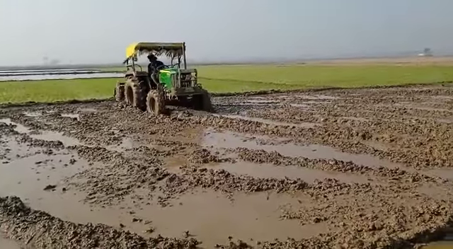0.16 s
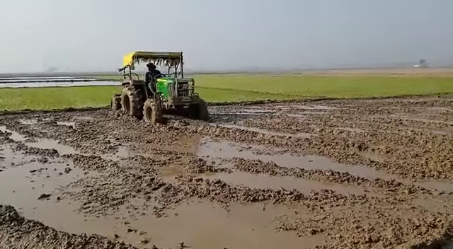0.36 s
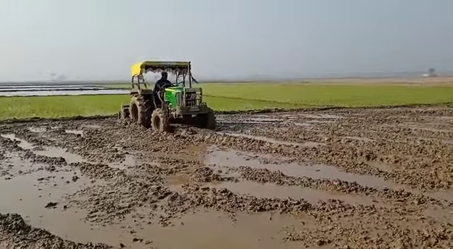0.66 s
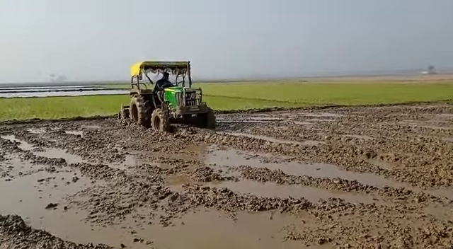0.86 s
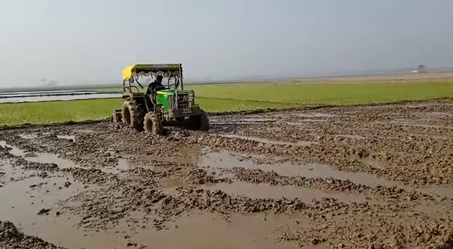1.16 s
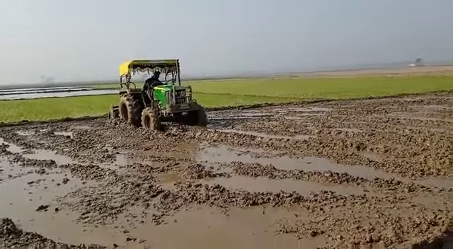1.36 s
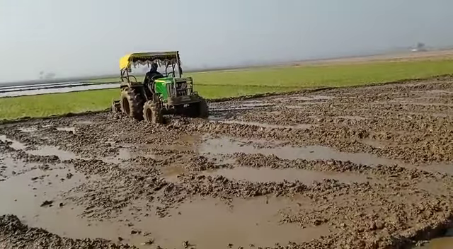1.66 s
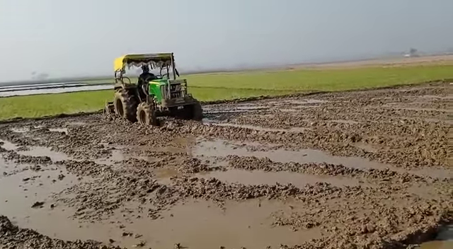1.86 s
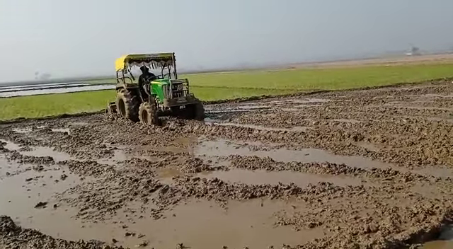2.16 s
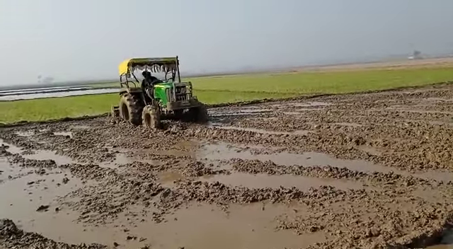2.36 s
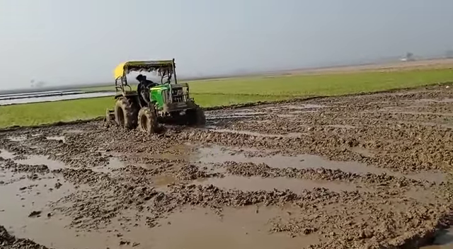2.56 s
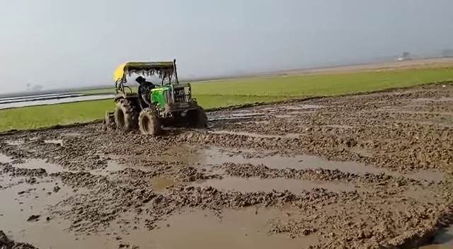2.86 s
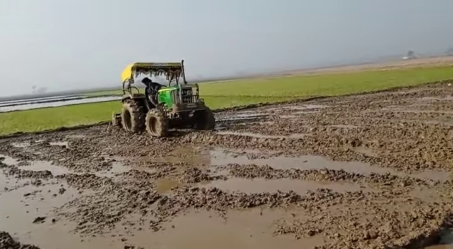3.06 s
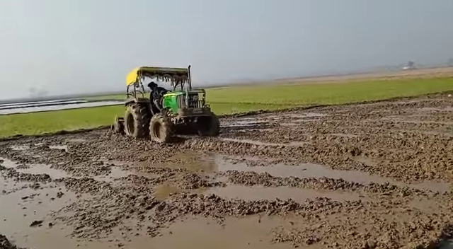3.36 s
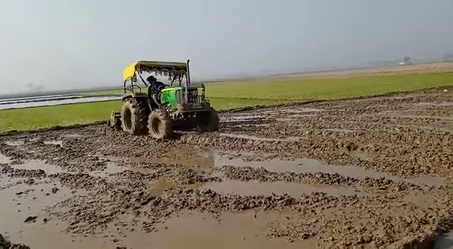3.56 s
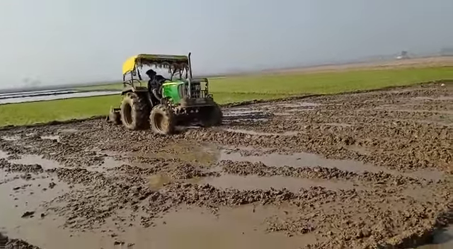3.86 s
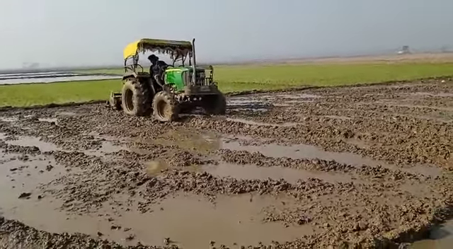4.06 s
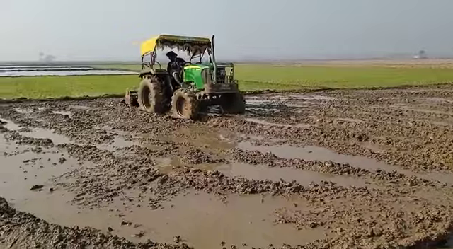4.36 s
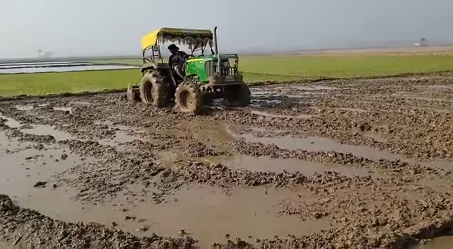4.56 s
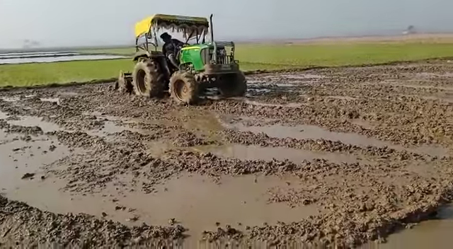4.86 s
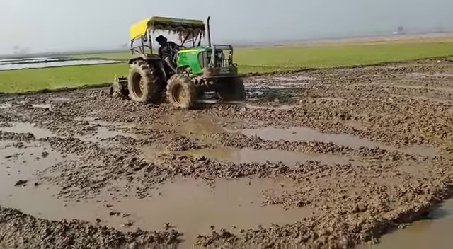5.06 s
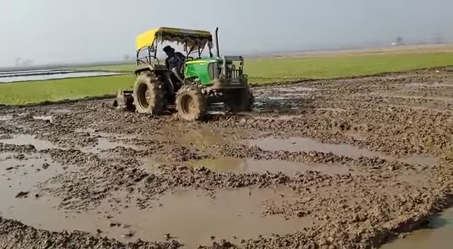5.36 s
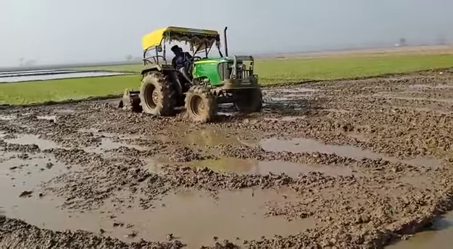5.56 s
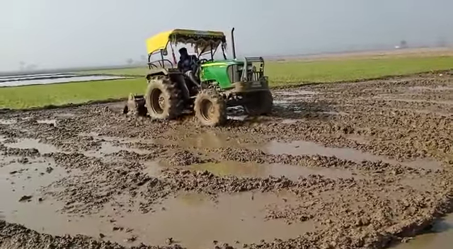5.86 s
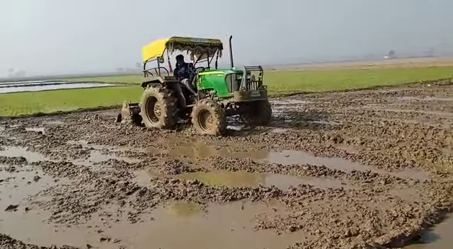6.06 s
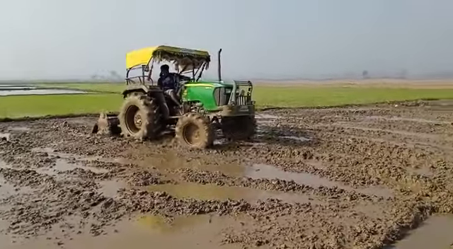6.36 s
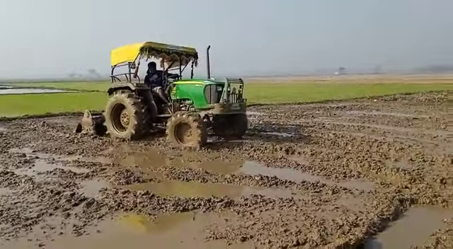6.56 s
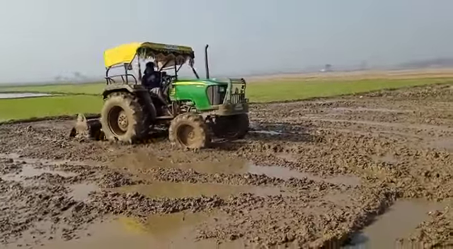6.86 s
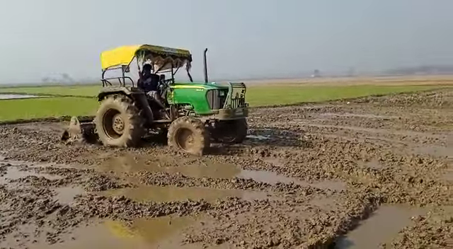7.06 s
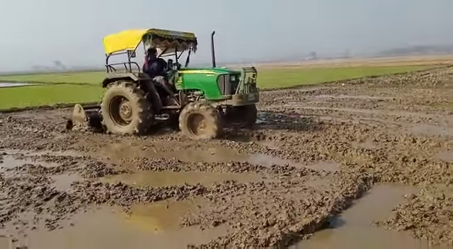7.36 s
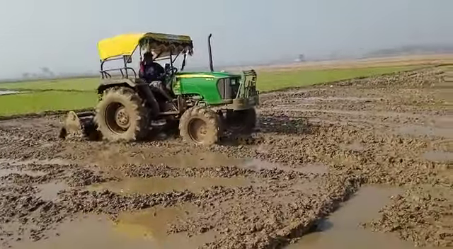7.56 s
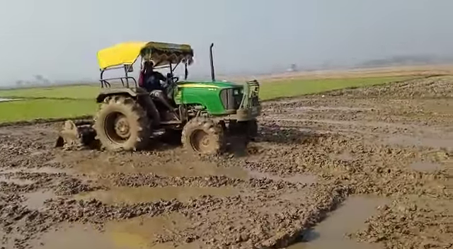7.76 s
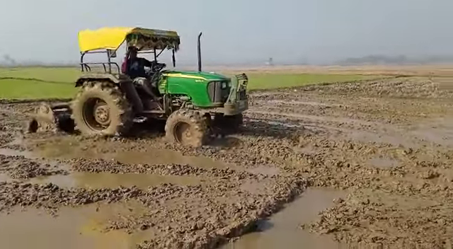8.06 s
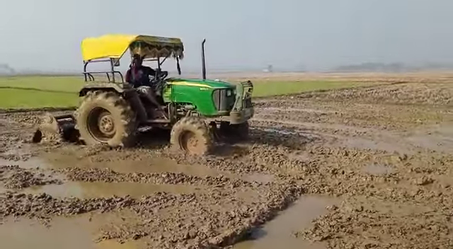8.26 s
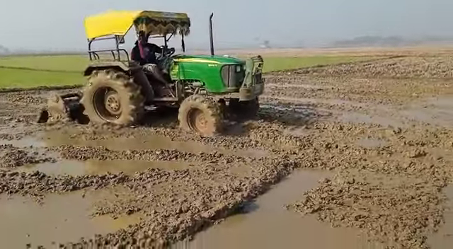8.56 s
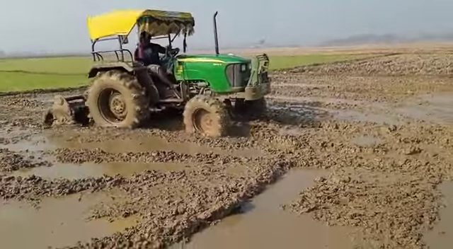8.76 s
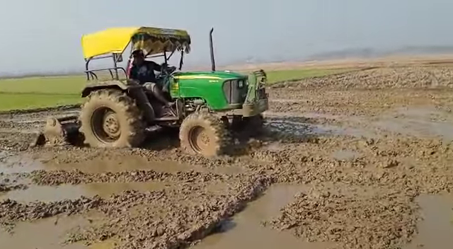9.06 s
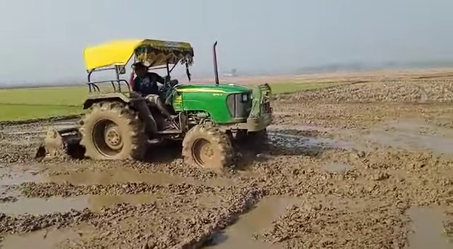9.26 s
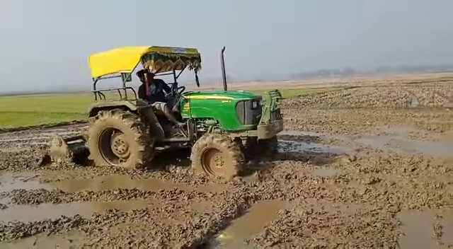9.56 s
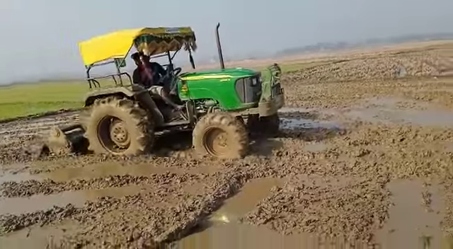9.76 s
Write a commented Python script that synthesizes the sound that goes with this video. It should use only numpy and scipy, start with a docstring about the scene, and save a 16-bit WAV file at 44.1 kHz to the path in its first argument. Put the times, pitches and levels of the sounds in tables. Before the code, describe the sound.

A diesel tractor chugs in an open, flooded field with no echo, its valves and gears clattering throughout. At first it runs lightly, some way off. A dull double thump sounds close to the microphone at about 0.4 seconds, and faint ticks of wet mud dot the first two seconds. The exhaust coughs twice near 1.4 seconds as the load comes on. Around 2.5 seconds there is a tiny metal squeak, the exhaust barks and the engine drops in pitch, laboring with hard knocks and metallic pings. Between 5 and 6.3 seconds it regains speed, then holds steady, growing louder and fuller as it approaches. From about 6 seconds a light hiss of flung mud appears. Another soft thump comes near 7.4 seconds, and the tiller's drone joins in, with mud pelting its hood, continuing under the engine until about 10 seconds.

```python
"""A flooded field, open and without reverberation: a three-cylinder diesel tractor drags a tiller, closing from
about 17 m to 11 m from the microphone. It runs light, takes up the load, lugs down with hard combustion knock
and regains its speed. Every firing drives the exhaust note, a bark from the stack and a knock in the block.
Gears and valves clatter throughout; later the tiller drones, throws mud and once strikes with a dull thump.
Close to the microphone are a double dull thump and faint ticks of wet mud."""
import sys
import numpy as np
from scipy import signal
from scipy.fft import rfft, irfft, next_fast_len
from scipy.io import wavfile
from scipy.ndimage import map_coordinates

SR = 44100
rng = np.random.default_rng(int(sys.argv[2]) if len(sys.argv) > 2 else 0)


def master(y):
    """Save y as 16-bit WAV."""
    cut = np.clip(np.atleast_2d(y).T, -1, 1)
    pcm = np.round(cut * 32767)  # scale
    wavfile.write(sys.argv[1], SR, pcm.astype(np.int16))


N = 437472

# engine speed (time [s], firing rate [Hz])
FIRING_RATE = [(0.0, 39.83), (0.54, 38.6), (1.2, 39.15), (1.47, 37.32), (2.16, 38.45), (2.53, 32.72),
               (2.84, 29.81), (3.64, 29.01), (3.98, 29.39), (4.51, 31.75), (4.96, 29.58), (5.83, 33.58),
               (6.29, 37.35), (6.74, 36.54), (7.03, 37.42), (7.36, 36.35), (8.27, 36.94), (8.55, 36.14),
               (8.68, 36.94), (9.92, 36.6)]
# firings that knock extra hard and ping (time [s], level [dB], ping pitch [Hz])
HARD_FIRINGS = [(2.4843, -19.5, 3700), (2.577, -18.5, 4180), (2.6075, -24, 4150), (2.8363, -25, 4100),
                (3.0685, -15, 4180), (3.1712, -18.5, 4060), (3.2387, -26, 4060), (3.273, -23, 4170),
                (3.3408, -21, 4060), (3.4418, -21, 4030), (3.5834, -21.5, 4000), (3.7544, -26, 4030),
                (3.8886, -18, 3970), (5.171, -21.5, 4230), (5.5228, -26, 3530), (5.6143, -25, 4030),
                (5.736, -21, 3350), (5.9165, -21, 3850), (6.1414, -24, 4150), (6.8199, -19.5, 4110)]
# valve and tappet level; every level law lists (base [dB], per doubling of load [dB],
# per extra firing a second [dB], per halving of distance [dB])
CLATTER_LAW = (-36, 1.5, -0.01, 7.5)


def exhaust_note(speed, turns, lag=0.11, flutter_db=0.54, uneven_db=-10.5):
    """Low orders of the firing rate; those in the pipe's resonance boom under load."""
    # resonance of the pipe (frequency [Hz], gain [dB])
    pipe = [(55, -14), (88, 1), (115, 2.5), (140, 1.5), (153, 1.5), (166, -3.5), (190, -15.5), (235, -26.5),
            (300, -21), (400, -32)]
    # steady orders while the engine runs light (multiple of the firing rate, level [dB])
    light_orders = [(1, -77), (5, -55), (6, -70), (7, -69), (8, -89)]
    # level laws of the second order and the boom (columns as CLATTER_LAW [dB])
    second_law = (-41.5, 2.5, 0.5, 13)
    boom_law = (-38.5, 9, 0.39, 2.5)
    throb = [(100, -7), (135, -10), (165, 1.5), (185, 5.5), (215, -37)]  # (frequency [Hz], gain [dB])
    angle = 2 * np.pi * (turns - lag)  # the gas pulse leaves the stack just after the firing
    boom = sum(amp(along(pipe, k * speed)) * np.cos(k * angle) for k in range(3, 9))
    cycle = (angle - 4 * np.pi) / 3
    for third in (10, 11, 13, 14, 16, 17):  # unequal cylinders add lines between the orders
        gain = amp(uneven_db + along(throb, third * speed / 3))
        boom += gain * np.cos(third * cycle + .7 * wobble(5))
    boom *= amp(level(boom_law) + flutter_db * wobble(30))
    second = amp(level(second_law)) * np.cos(2 * angle)
    running_light = np.clip(speed - 37, 0, 1)
    light_note = running_light * sum(amp(db) * np.cos(round(k) * angle) for k, db in light_orders)
    return np.sqrt(2) * (second + boom + light_note)


def exhaust_gas(firings, surge_s=2.6, surge_width_s=.19):
    """Each puff rumbles in the silencer and barks at the mouth of the stack."""
    # spectra of silencer and stack (frequency [Hz], relative level [dB])
    silencer = [(25, -13), (50, -19.5), (75, -6), (120, -5.5), (165, 3), (195, 0), (230, -4), (300, -8.5),
                (420, -30.5), (700, -46)]
    stack = [(200, -16), (340, -6.5), (460, -5.5), (660, -0.5), (880, -4), (1130, -8.5), (1400, -15),
             (1700, -6), (1950, -24), (2400, -35)]
    # their level laws (columns as CLATTER_LAW [dB])
    rumble_law = (-41, 3.5, -0.02, 5.5)
    bark_law = (-40, 11, -0.94, 17.5)
    # the stack barks hardest as the governor first opens fully
    surge_db = 7 * np.exp(-((np.arange(N) / SR - surge_s) / surge_width_s) ** 2)
    scatter = rng.standard_normal(len(firings))
    puffs = bursts(firings - .001, 2.6 * scatter, rise_s=0.0085, decay_s=0.022)
    rumble = coloured(puffs * rng.standard_normal(N), silencer) * amp(level(rumble_law))
    barks = bursts(firings - .002, 3.1 * scatter, rise_s=0.001, decay_s=0.0058)
    return rumble + coloured(barks * rng.standard_normal(N), stack) * amp(level(bark_law) + surge_db)


def knock(firings, rattle_db=-2.5, ring_db=-3, cylinder_db=1.54, usual_peak_db=-28):
    """Combustion shakes the block with a cluster of impacts and sets it ringing."""
    # how hard combustion knocks, flaring as the engine is dragged down (time [s], level [dB])
    knocking = [(0, -63), (1.3, -55.5), (1.6, -44), (2.28, -56), (2.48, -37.5), (3.1, -40.5), (4.35, -39.5),
                (4.85, -41.5), (5.2, -39.5), (5.9, -37.5), (6.4, -43.5), (8.6, -42.5), (9.0, -50),
                (9.35, -38.5), (9.92, -43.5)]
    # spectrum of the impacts (frequency [Hz], relative level [dB])
    impacts = [(1500, -42), (1950, -11.5), (2250, -8), (2880, 1.5), (3200, -4), (3600, 5.5), (4100, 3),
               (4600, 3.5), (5300, -11.5), (7300, -15.5), (8600, -23), (11000, -30), (13500, -64)]
    knock_db, = curves(knocking)
    cylinders = np.resize([0, 1, -1], len(firings))  # one cylinder knocks hardest
    sizes_db = cylinder_db * cylinders + 0.78 * rng.standard_normal(len(firings))
    for s, peak_db, _ in HARD_FIRINGS:
        sizes_db[np.argmin(abs(firings - s))] = 0.23 * (peak_db - usual_peak_db)
    blows = bursts(firings - .0028, sizes_db, rise_s=0.002, decay_s=0.007)
    blows *= ticks(per_second=14000, spread_db=2.5)
    rattle = coloured(blows, impacts)
    # the recorder adds a faint fizz near 15 kHz that pulses with each knock
    recorder_fizz = amp(-36) * coloured(blows, [(13800, -30), (14800, -6), (15700, -2)])
    # harder blows put a larger share into the ringing
    ring = block_ring(firings - .0025, 1.35 * sizes_db, detune=.022, scatter_db=5)
    return (amp(rattle_db) * (rattle + recorder_fizz) + amp(ring_db) * ring) * amp(knock_db)


def block_ring(starts, sizes_db, detune, scatter_db):
    """Each blow rings the block's modes at new strengths and slightly new pitches; rms 1."""
    # modes of the engine block (frequency [Hz], relative level [dB], t60 [s])
    modes = [(2283, -10.5, 0.049), (2872, -6, 0.08), (3130, -3.5, 0.033), (3540, -2, 0.073),
             (3850, -15, 0.015), (4087, 7, 0.022), (4317, -4, 0.13), (4540, -38, 0.019)]
    t = np.arange(SR // 20) / SR
    chance = rng.standard_normal((len(starts), 3, len(modes), 1))
    rings = 0
    for k, (hz, db, t60) in enumerate(modes):
        strength, pitch, phase = chance[:, 0, k], chance[:, 1, k], chance[:, 2, k]
        fade = amp(db - 60 * t / t60) * (1 - np.exp(-t / 0.0018))
        tone = np.sin(2 * np.pi * (hz * (1 + detune * pitch) * t + phase))
        rings += amp(scatter_db * np.clip(strength, -2, 1)) * fade * tone
    rings *= amp(sizes_db)[:, None]
    samples = np.clip(starts * SR, 0, N).astype(int)[:, None] + np.arange(len(t))
    return unit(np.bincount(samples.ravel(), rings.ravel(), N)[:N])


def pings(gain_db=0.5, rise_s=0.0015, t60_s=0.035):
    """A hard firing sets the gas in the cylinder ringing at one pitch."""
    track, t = np.zeros(N), np.arange(SR // 20) / SR
    fade = amp(gain_db - 60 * t / t60_s) * (1 - np.exp(-(t / rise_s) ** 2))
    for s, db, hz in HARD_FIRINGS:
        add(track, s - .001, amp(db) * fade * np.sin(2 * np.pi * hz * t))
    return track


def running_gear(turns):
    """Valves and gears tick without pause; the colour opens as the tractor nears the microphone."""
    # spectra of gears and of far and near valves (frequency [Hz], relative level [dB])
    gear_colour = [(200, -18.5), (335, 4), (480, -1), (750, 2.5), (950, 0), (1120, -6), (1330, 0.5),
                   (1650, -4), (1880, -4), (2300, -59)]
    far_colour = [(1600, -44), (1930, -14.5), (2150, -1), (2400, -4), (2600, -6.5), (2950, 4.5),
                  (3250, -2.5), (3530, 3), (3950, -5.5), (4400, -5.5), (4900, -8.5), (5400, -13.5),
                  (6500, -46)]
    near_colour = [(1600, -36), (1930, -2), (2150, 4.5), (2400, 2), (2950, 7), (3500, 5.5), (3950, 7),
                   (4400, -10), (4900, -4), (5400, -64), (6500, -2)]
    # valve hiss, topped by the recorder's thin fizz near 15 kHz (frequency [Hz], relative level [dB])
    hiss_colour = [(4500, -27), (5500, 0), (6400, -8.5), (8100, -17), (9800, -15), (11500, -21),
                   (13800, -31), (15000, -15.5), (15700, -15.5)]
    # level laws of gears and hiss (columns as CLATTER_LAW [dB])
    gear_law = (-41, 3.5, 0.07, 9.5)
    hiss_law = (-53, 2.1, -0.07, 11.5)
    near = np.clip((np.arange(N) / SR - 4.5) / 3, 0, 1)  # crossfade from 4.5 to 7.5 s
    closing_db = 0.81 * np.cos(4 * np.pi * (turns - .3))  # two valves close per firing
    valves = unit(amp(closing_db + 1.73 * wobble(60)))
    ticking = lambda: ticks(per_second=7000, spread_db=1.5)
    far_clatter = np.sqrt(1 - near) * coloured(valves * ticking(), far_colour)
    near_clatter = np.sqrt(near) * coloured(valves * ticking(), near_colour)
    clatter = (far_clatter + near_clatter) * amp(level(CLATTER_LAW) - 2)
    gears = coloured(ticking(), gear_colour) * amp(level(gear_law))
    hiss = coloured(valves * rng.standard_normal(N), hiss_colour) * amp(level(hiss_law))
    return clatter + gears + hiss


def tappets(turns, gain_db=-5.5):
    """Tappets and injectors strike three times per firing, each blow ringing the block."""
    beats = np.arange(1, turns[-1], 1 / 3)
    timing, strength = rng.standard_normal((len(beats), 2)).T
    starts = np.interp(beats + .08 * timing, turns, np.arange(N) / SR)
    rings = block_ring(starts, 3 * strength, detune=.04, scatter_db=7)
    rings = coloured(rings, [(2000, 3.5), (3000, 5), (4000, -2), (5000, 1)])
    return unit(rings) * amp(level(CLATTER_LAW) + gain_db)


def tiller(turns, cycles_per_firing=4.87, hood_db=-7):
    """The drive hums in step with the engine while the blades fling wet mud against the hood."""
    # the tiller comes out from behind the tractor (time [s], hum level [dB], spray level [dB])
    emerging = [(5.5, -78, -83), (6.3, -71, -53), (7.1, -65, -49), (7.4, -53, -47), (7.7, -43, -48.5),
                (8.35, -56, -45.5), (8.85, -44, -48.5), (9.92, -42, -51)]
    # spectra of the pelted sheet-steel hood and the mud spray (frequency [Hz], relative level [dB])
    hood_colour = [(200, -19), (340, 3), (520, -11), (700, -8.5), (830, 20), (1080, -8), (1320, 16.5),
                   (1550, -33), (2200, -43)]
    spray_colour = [(2000, -46), (3500, 0), (5000, 10.5), (6100, 0.5), (7100, -12), (8300, -27),
                    (12000, -32)]
    hum_db, spray_db = curves(emerging)
    angle = 2 * np.pi * cycles_per_firing * turns + 0.69 * wobble(7)
    hum = np.sqrt(2) * (np.sin(angle) + amp(-12) * np.sin(angle / 2))
    hum *= amp(hum_db + 0.37 * wobble(12))
    hood = coloured(ticks(per_second=1400, spread_db=1.5), hood_colour)
    hood *= amp(hum_db + hood_db + 1.6 * wobble(12))
    spray = coloured(ticks(per_second=4600, spread_db=9), spray_colour) * amp(spray_db + wobble(14))
    return hum + hood + spray


def thumps(puff_db=-5):
    """Soft thumps, first a double one near the microphone, later a single one as the tiller strikes: a low tone
    with a puff of noise."""
    # dull blows (time [s], level [dB], pitch [Hz], t60 [s])
    blows = [(.359, -18, 150, 0.034), (0.377, -26.5, 114, 0.053), (7.391, -29, 179, 0.15)]
    # spectrum of the puff (frequency [Hz], relative level [dB])
    puff_colour = [(80, -18), (150, 6), (300, -3), (520, -10), (750, -9), (1100, -20), (1600, -47)]
    tones, puffs = np.zeros((2, N))
    t = np.arange(SR // 4) / SR
    for s, db, hz, t60 in blows:
        fade = amp(db - 60 * t / t60) * (1 - np.exp(-t / 0.0012))
        add(tones, s, fade * np.sin(2 * np.pi * hz * t))
        add(puffs, s - .002, amp(puff_db) * fade)
    tones = signal.sosfilt(signal.butter(2, 75, 'highpass', fs=SR, output='sos'), tones)
    return tones + coloured(puffs * rng.standard_normal(N), puff_colour)


def coughs():
    """The stack coughs twice as fuel comes on."""
    # puffs of gas (time [s], level [dB], t60 [s])
    puffs = [(1.353, -30.5, 0.2), (1.402, -32.5, 0.091)]
    # their spectrum (frequency [Hz], relative level [dB])
    colour = [(100, -13), (260, 4.5), (500, -2), (800, 6), (1400, -6), (2000, -11), (4000, -35)]
    gas, t = np.zeros(N), np.arange(SR // 4) / SR
    for s, db, t60 in puffs:
        add(gas, s, amp(db - 60 * t / t60) * (1 - np.exp(-t / 0.0095)))
    return coloured(gas * rng.standard_normal(N), colour)


def squeaks():
    """Dry metal joints in the linkage chirp briefly."""
    # chirps (time [s], level [dB], pitch [Hz], length [s])
    chirps = [(1.602, -61, 7350, 0.069), (2.391, -43, 5640, 0.029)]
    track, t = np.zeros(N), np.arange(N) / SR
    for s, db, hz, length in chirps:
        swell = amp(db) * np.exp(-(2 * (t - s) / length) ** 2)
        track += swell * np.sin(2 * np.pi * hz * t + wobble(360))
    return track


def mud_ticks(t60_s=.025):
    """Tiny bubbles burst in the wet mud close to the microphone."""
    # bursting bubbles (time [s], relative level [dB])
    bubbles = [(0.4387, -50), (0.8164, -54), (1.006, -52), (1.5702, -54), (1.6749, -51), (1.845, -52),
               (1.9618, -50), (2.081, -49), (2.1858, -55)]
    track, t = np.zeros(N), np.arange(SR // 20) / SR
    for s, db in bubbles:
        add(track, s, amp(db - 3 - 60 * t / t60_s) * rng.standard_normal(len(t)))
    return coloured(track, [(6000, -16), (8500, 2), (10500, 0), (12500, -25), (15500, -12)])


def ground_echo(x, lag_ms=1.409, ms_per_halving=0.2, strength=0.11):
    """The path by way of the water lags more as the tractor nears, so its comb of notches slides down."""
    delay_ms = lag_ms + ms_per_halving * nearness()
    echo = map_coordinates(x, [np.arange(N) - delay_ms * SR / 1000])
    return (x + strength * echo) / np.sqrt(1 + strength ** 2)


def nearness(reference_m=12):
    """How many times the distance to the microphone has halved, counted from the reference."""
    # the tractor's approach (time [s], distance [m])
    approach = [(0, 16.7), (3, 19), (5, 16.7), (6.5, 12.82), (9.92, 10.84)]
    metres, = curves(approach)
    return np.log2(reference_m / metres)


def level(law, governed_hz=37):
    """A part's level in dB at the microphone, from the engine's load, speed and distance."""
    # light running, a first bite, the full pull, then steady work (time [s], share of full load [0-1])
    engine_load = [(0, 0.48), (.22, 0.14), (.65, 0.26), (1.3, 0.19), (1.58, 0.8), (1.85, 0.57),
                   (2.25, 0.49), (2.45, 1), (2.95, 0.64), (4.1, 0.65), (4.4, .78), (4.95, 0.6), (5.6, 0.74),
                   (6.1, .8), (6.4, 0.55), (8.6, 0.59), (9.0, 0.41), (9.5, 0.56), (9.92, 0.65)]
    base_db, per_load, per_speed, per_halving = law
    load, = curves(engine_load)
    speed, = curves(FIRING_RATE)
    engine_db = base_db + per_load * np.log2(load) + per_speed * (speed - governed_hz)
    return engine_db + per_halving * nearness()


def amp(db):
    """Decibels to gain."""
    return 10 ** (np.asarray(db) / 20)


def unit(x):
    """Scale to rms 1."""
    return x / np.sqrt(np.mean(x ** 2) + 1e-20)


def along(points, hz):
    """Interpolate (frequency [Hz], value) points on a log axis."""
    f, v = np.transpose(points)
    return np.interp(np.log(hz + 1), np.log(f), v)


def curves(rows):
    """One value per sample for each column after the time."""
    s, *cols = np.transpose(rows)
    return [np.interp(np.arange(N) / SR, s, c) for c in cols]


def wobble(rate):
    """A smooth random curve, rate knots a second."""
    knots = rng.standard_normal(int(N * rate / SR) + 4)
    return map_coordinates(knots, [np.arange(N) * rate / SR])


def coloured(x, spectrum):
    """Causal filter of unit power gain that falls away outside its (frequency [Hz], level [dB]) points."""
    m = next_fast_len(N + SR // 4, real=True)
    hz = np.fft.rfftfreq(m, 1 / SR)
    closed = [(spectrum[0][0] / 2, -90), *spectrum, (spectrum[-1][0] * 2, -90)]
    cepstrum = irfft(np.log(unit(amp(along(closed, hz)))), m)
    cepstrum[1:m // 2] *= 2  # fold to minimum phase
    cepstrum[m // 2 + 1:] = 0
    return irfft(rfft(x, m) * np.exp(rfft(cepstrum)), m)[:N]


def ticks(per_second, spread_db):
    """Random tiny impacts of uneven size, rms 1."""
    impacts = (rng.random(N) < per_second / SR) * rng.standard_normal(N)
    return unit(impacts * amp(spread_db * np.clip(rng.standard_normal(N), -2, 2)))


def bursts(starts, sizes_db, rise_s, decay_s):
    """An envelope of rms 1 with one swell at each start."""
    t = np.arange(SR // 12) / SR
    blows = np.bincount(np.clip(starts * SR, 0, N - 1).astype(int), amp(sizes_db), N)
    swell = (1 - np.exp(-(t / rise_s) ** 2)) * np.exp(-t / decay_s)
    return unit(signal.fftconvolve(blows, swell)[:N])


def add(track, s, sound):
    """Mix a sound into a track at time s."""
    part = track[max(round(s * SR), 0):][:len(sound)]
    part += sound[:len(part)]


def scene():
    """One microphone in the open field; engine and tiller follow one crankshaft."""
    speed, = curves(FIRING_RATE)
    turns = np.cumsum(speed) / SR  # a firing at every whole number
    firings = np.interp(np.arange(1, turns[-1]), turns, np.arange(N) / SR)
    clatter = exhaust_gas(firings) + knock(firings) + tappets(turns) + running_gear(turns)
    engine = exhaust_note(speed, turns) + ground_echo(clatter) + pings()
    return (engine + tiller(turns) + thumps() + coughs() + squeaks() + mud_ticks())[None]


def record(dry, top_hz=15800):
    """The recorder keeps nothing above its band limit."""
    m = next_fast_len(N + SR // 4)
    passband = np.fft.rfftfreq(m, 1 / SR) < top_hz
    return irfft(rfft(dry, m) * passband, m)[..., :N]


dry = scene()
out = record(dry)
master(out)
```